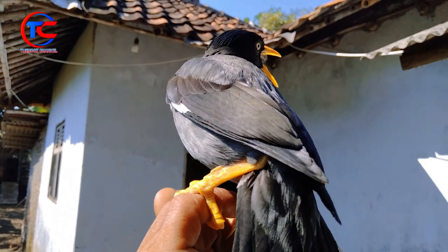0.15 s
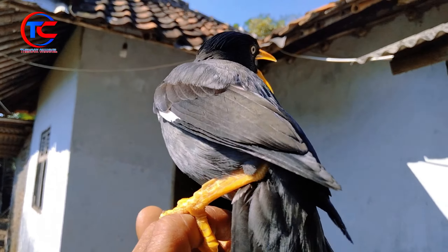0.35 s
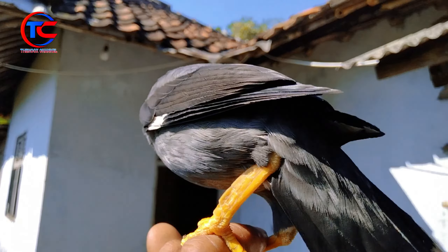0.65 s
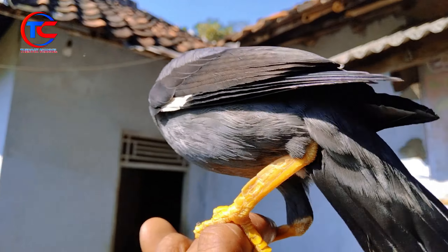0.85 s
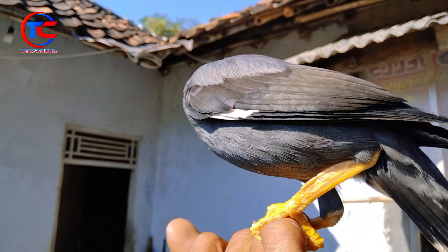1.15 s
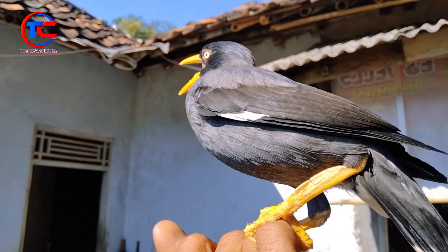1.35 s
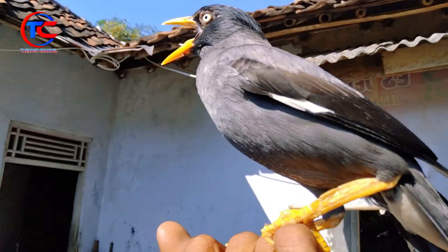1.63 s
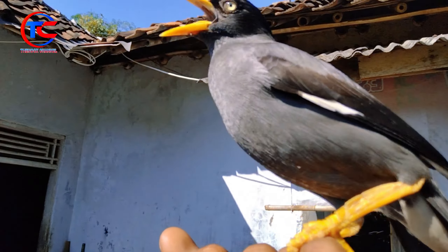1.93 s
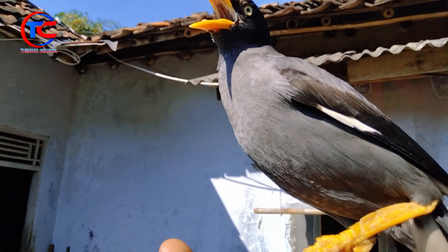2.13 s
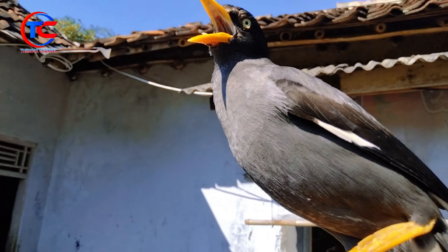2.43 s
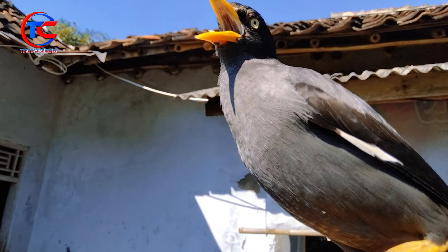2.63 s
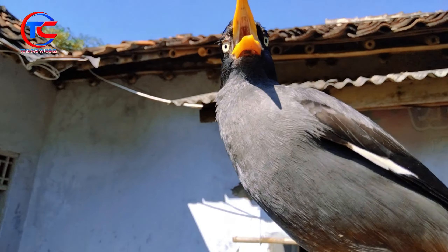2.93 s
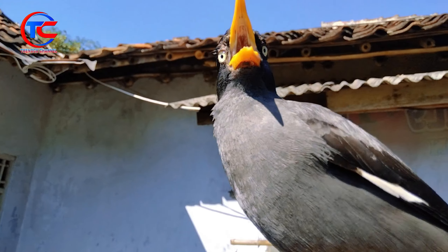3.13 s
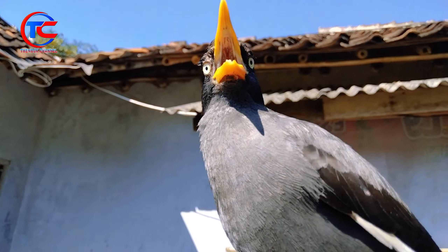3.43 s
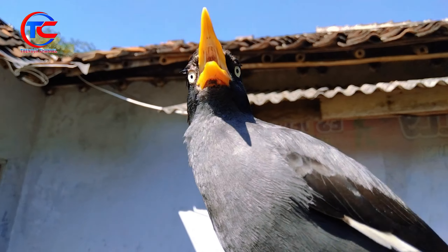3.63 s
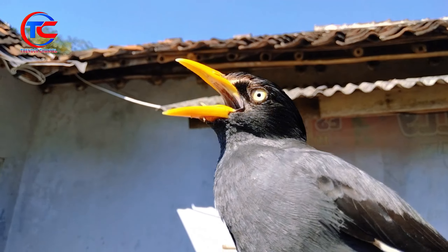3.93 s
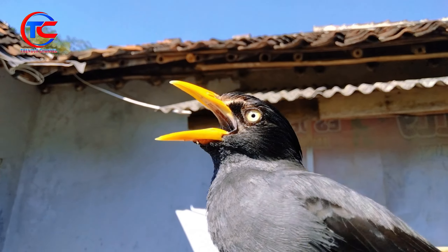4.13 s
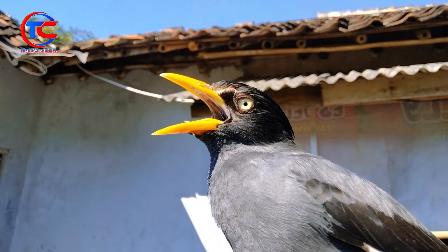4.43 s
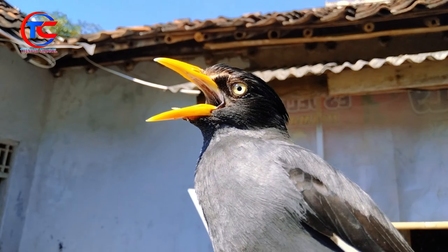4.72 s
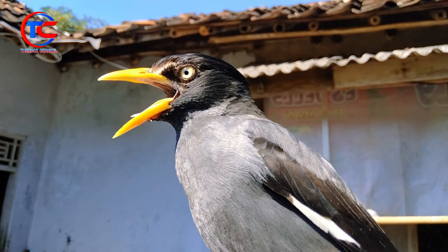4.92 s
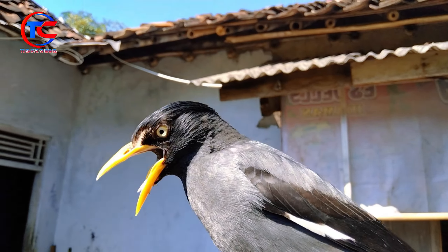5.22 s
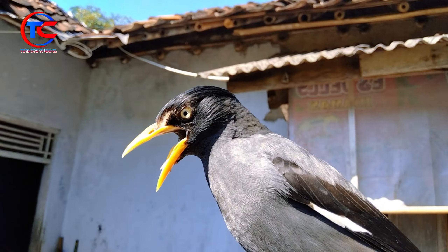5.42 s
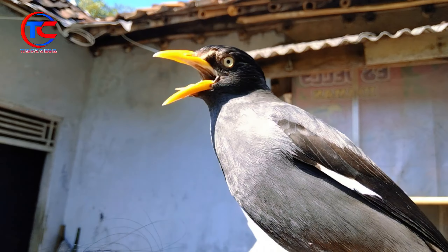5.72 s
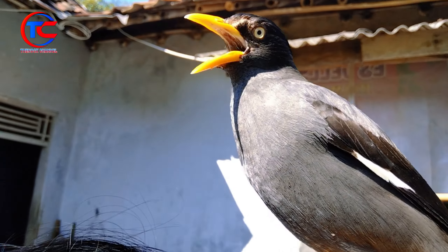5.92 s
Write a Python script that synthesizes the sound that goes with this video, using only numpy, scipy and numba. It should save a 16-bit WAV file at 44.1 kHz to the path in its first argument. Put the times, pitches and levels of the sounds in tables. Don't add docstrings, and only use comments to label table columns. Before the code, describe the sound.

Outdoors in a house yard, a loud close bird chatters hoarsely, pauses while another bird whistles gently at a distance, then fires off sharp high two-part whistles and clipped falling chips. A second burst of chatter gives way to sparse beak ticks and two isolated short notes. The sound is bright, slightly overloaded and doubled, with low traffic rumble that dips under loud calls.

```python
import sys
import numpy as np
from scipy import signal
from scipy.fft import rfft, irfft, next_fast_len
from scipy.io import wavfile
from scipy.ndimage import uniform_filter1d, minimum_filter1d
from numba import njit

SR = 44100
rng = np.random.default_rng(int(sys.argv[2]) if len(sys.argv) > 2 else 0)


def int16_out(signal):
    q = np.round(np.clip(np.atleast_2d(signal).T, -1, 1) * 32767)
    wavfile.write(sys.argv[1], SR, q.astype(np.int16))


def elevation(decibels):
    levels = np.asarray(decibels, float)
    return 10 ** (levels / 20)


N = 267598
T = np.arange(N) / SR


def colour(table, hz):
    f, db = np.transpose(table)
    return elevation(np.interp(np.log(np.maximum(hz, 1)), np.log(f), db))


def unit(x):
    return x / np.sqrt(np.mean(x ** 2))


def shaped(x, table):
    n = next_fast_len(len(x))
    hz = np.arange(n // 2 + 1) * SR / n
    return irfft(rfft(x, n) * colour(table, hz), n)[:len(x)]


def ring(x, hz, width):
    return signal.lfilter(*signal.iirpeak(hz, hz / width, SR), x)


def walk(rate):
    k = int(SR / rate)
    return unit(uniform_filter1d(uniform_filter1d(rng.standard_normal(N), k), k))


def myna(strokes, calls, wobble=.025, flutter_db=7, air_db=-16):
    throat = list(zip([900, 1300, 2350, 2950, 3600, 4400, 5400, 6200, 7200, 8500, 10800, 12500, 14500, 16000],
              [-26, -12, -13, -6, -1, 0, -8, -18, -8, -4, -9, -26, -16, -34]))
    patchy_db = 2.5
    shake = walk(740) + walk(286)
    flutter = walk(390)
    air = unit(shaped(rng.standard_normal(N), throat))
    patches = walk(150)
    columns = []
    for j in range(len(strokes[0])):
        columns.append(np.concatenate([stroke[j] + np.zeros(len(stroke[0])) for stroke in strokes]))
    ms, *shape = columns
    ms = np.maximum.accumulate(ms)
    k = np.arange(1, 25)[:, None] / 2
    out = np.zeros(N)
    for start, db, longer, slope_db, rough in calls:
        at = start + ms * np.clip(longer, .92, 1.05) / 1000
        rough = max(rough, .1)
        on = (T > at[0]) & (T < at[-1])
        pitch, effort_db, dull_db, half = (np.interp(T[on], at, column) for column in shape)
        hz = pitch * (1 + wobble * rough * shake[on])
        phase = 2 * np.pi * np.cumsum(hz) / SR
        share = np.where(k % 1 == 0, 1, np.clip(half, 0, 1))
        slope = slope_db * np.log2(np.maximum(k, 1)) + dull_db * np.log2(np.maximum(k / 2, 1))
        size = share * elevation(slope) * colour(throat, k * hz)
        breakup = np.array([np.roll(patches, 7919 * j)[on] for j in range(len(k))])
        size = size * elevation(patchy_db * breakup)
        tone = np.sum(size * np.sin(k * phase), axis=0)
        fade = np.clip((at[-1] - T[on]) / .008, 0, 1)
        level = elevation(db + effort_db + flutter_db * rough * flutter[on])
        out[on] += fade * level * (tone + elevation(air_db) * rough * air[on])
    return out


def double_whistles():
    # (time [ms], pitch [Hz], effort [dB], extra overtone slope [dB/octave], half-pitch share [0-1])
    strokes = [
        ([-4, -1, 2, 10, 18, 26, 33, 39, 43], [3000, 3450, 3900, 4820, 5480, 5460, 5300, 4800, 3800], [-39, -11.5, -2.5, 1.5, -11, -1.5, -4, -13, -38], -7, 0),
        ([45, 50, 54, 58, 66, 72, 80, 90, 105], [2700, 3150, 3620, 3920, 4230, 4580, 4780, 4900, 4880], [-19, -10.5, 2.5, 3, 3.5, -1.5, -1, -19.5, -9], -1.5, 0),
    ]
    # (time [s], level [dB], length factor, overtone slope [dB/octave], roughness [0-1])
    calls = [(1.349, -6, .95, -9, .45), (1.624, -4, 1.0, -7, .45), (1.858, -3, .95, -6, .45),
             (2.362, -4, 1.0, -3, .35)]
    return myna(strokes, calls)


def chatter_and_chips():
    # (time [ms], pitch [Hz], effort [dB], extra overtone slope [dB/octave], half-pitch share [0-1])
    chatter = [
        ([-5, -1, 4, 13, 20], [1040, 1380, 1780, 1880, 1830], [-16, -1.5, -1, 0.5, -22], -13.5, 0),
        ([21, 24, 27, 33, 39, 43], [1900, 1980, 2120, 2100, 2030, 2400], [-24, -18, -2, 3.5, -1.5, -24], -8.5, 0),
        ([44, 46, 51, 56, 62, 73, 79], [2800, 2920, 2890, 2730, 2750, 2590, 2550], [4, -10.5, -2.5, -11, -21, -5, -5.5], -5.5, 0),
        ([84, 90, 104, 112], [2470, 2350, 2270, 2250], [-10, -7, -9.5, -36], -8, 0.46),
    ]
    churk = [
        ([-7, -3, 4, 10, 14, 18], [1950, 1920, 1830, 1770, 1815, 2120], [-29, -5.5, -3.5, -1.5, -9, -2.5], -5.5, 0),
        ([21, 26, 30, 43, 48, 54], [2480, 2440, 2340, 2120, 2110, 2100], [-11, -14, -5.5, -5.5, -6, -15], -16, 0),
    ]
    hook = (([-6, -2, 2, 6, 10, 14, 22, 27, 33], [2220, 2230, 2310, 2610, 2420, 2230, 1950, 1895, 1870],
            [-35, -14, -4, -10, -4, 0, -7, -16, -40], -16, 0),)
    chip = (([-14, -10, -2, 2, 6, 10, 14, 30], [1600, 1800, 2200, 2110, 1930, 1790, 1735, 1725],
            [-32, -16, -9, -4, 0, -3, -7, -24], -17, 0),)
    slide = (([-5, -1, 2, 10, 14, 20, 26], [2010, 1990, 1950, 1710, 1640, 1610, 1600],
             [-30, -10, 0, -6, -10, -16, -35], -13, 0),)
    low_note = (([-5.5, 0, 11.5, 24.5, 39], [1430, 1498, 1472, 1394, 1300], [-32, -14, -4.5, -3.5, -3],
                -17, 0),)
    # (time [s], level [dB], length factor, overtone slope [dB/octave], roughness [0-1])
    chatter_calls = [(-.027, -4.5, 1.05, 2, 0.38), (0.114, -5.5, 1.01, 2, 0.37), (0.256, -4, 1.04, 1, 0.42),
                     (3.892, -5, 1.2, -3, 0.28), (4.041, -2.5, 1.0, -2, 0.37), (4.186, -3, 1.06, -1, 0.33),
                     (4.347, -5.5, 1.03, -1, 0.28)]
    churk_calls = [(2.612, 0.5, 1, -3.5, 0.19), (2.77, -1, .93, -2, 0.26)]
    hook_calls = [(3.34, 0, 0.93, -0.36, 0.23)]
    chip_calls = [(3.561, 0.5, 1, -1.7, 0.25), (3.763, 1, 1.2, -2, 0.39)]
    slide_calls = [(5.441, 2, 1.0, -7, 0.15)]
    low_calls = [(6.034, 3.2, 1, -8.5, 0.071)]
    voices = [(chatter, chatter_calls), (churk, churk_calls), (hook, hook_calls),
              (chip, chip_calls), (slide, slide_calls), (low_note, low_calls)]
    return sum(myna(strokes, calls) for strokes, calls in voices)


def ticks(crack_s=0.0034):
    # (time [s], level [dB])
    tick_times = [(5.28, -23.5), (5.301, -29), (5.317, -35), (5.365, -13), (5.386, -24)]
    # (frequency [Hz], width [Hz], level [dB])
    tick_modes = [(4900, 2800, -11.5), (6960, 1300, -7.5), (9400, 2200, -0.5), (14900, 1500, -5)]
    cracks = sum(elevation(db) * np.exp(-np.maximum(T - s, 0) / crack_s) * (T >= s) for s, db in tick_times)
    push = cracks * rng.standard_normal(N)
    return 3 * sum(elevation(db) * ring(ring(push, hz, width), hz, width) for hz, width, db in tick_modes)


def neighbour(edge_s=0.0059, swell_s=0.035):
    # (time [s], length [s], top pitch [Hz], top reached at share [0-1], level [dB])
    arches = [(0.412, 0.22, 2429, 0.62, -16), (.72, .175, 2573, 0.5, -25), (1.029, 0.16, 2294, 0.35, -6),
              (1.313, 0.16, 2379, 0.46, -12), (1.598, .16, 2298, 0.6, -14.5),
              (1.905, 0.16, 2220, 0.63, -10), (2.164, 0.14, 2253, 0.44, -13),
              (2.405, 0.13, 2168, 0.69, -16.5), (2.641, 0.16, 2168, 0.51, -15.5),
              (2.883, 0.15, 2368, 0.63, -14.5), (3.143, 0.12, 2335, 0.85, -16)]
    # (breath [dB], hoarseness [0-1], louder towards the end [dB],
    # dip in the middle [dB], last pitch [share of top])
    voicing = [(-37, 0.24, -5.5, 0, .87), (-34, 0.23, -5, 2.5, 0.87), (-35, 0.17, 0.5, 3, .87),
               (-35, 0.29, -3, -4, .86), (-41, 0.2, -7, -2, .89), (-40.5, .056, -4, 2.5, .88),
               (-41.5, 0.21, -4.5, 2.5, .88), (-58, 0.08, 3, -4, .92), (-45, 0.1, 0, -6.5, .93),
               (-41, 0.32, 1, 8, 0.85), (-40.5, 0.24, -5, -3, 1)]
    # (time [s], length [s], from [Hz], to [Hz], level [dB])
    breaks = [
        (.795, .09, 2790, 2810, -25),
        (.872, .038, 2400, 2060, -13),
    ]
    # (frequency [Hz], level [dB per Hz])
    breath_colour = [(1500, -16), (3000, -18), (5300, -24), (6300, -1), (8000, -4), (9600, 0), (11300, -20),
                     (14500, -26)]
    start_hz, rise_power, fall_power = 1806, 2.1, 2.68
    arch_edge_db, breath_edge_db, edge_power = -15.5, -14, 5.8
    out, puff = np.zeros(N), np.zeros(N)
    wobble, flutter = walk(230), walk(110)
    rasp = unit(ring(ring(rng.standard_normal(N), 2200, 900), 2200, 900))
    for arch, voice in zip(arches, voicing):
        s, length, top_hz, peak, db = arch
        air_db, hoarse, tilt_db, dip_db, last = voice
        on = (T > s) & (T < s + length)
        u = (T[on] - s) / length
        rise = np.clip(1 - u / peak, 0, 1)
        fall = np.clip((u - peak) / (1 - peak), 0, 1)
        hz = top_hz - (top_hz - start_hz) * rise ** rise_power - top_hz * (1 - last) * fall ** fall_power
        phase = 2 * np.pi * np.cumsum(hz * (1 + 0.032 * hoarse * wobble[on])) / SR
        fade = np.clip(np.minimum(u, 1 - u) * length / edge_s, 0, 1)
        edge = abs(2 * u - 1) ** edge_power
        level_db = db + arch_edge_db * edge + tilt_db * (2 * u - 1) - dip_db * np.sin(np.pi * u) ** 2
        breath = elevation(air_db + breath_edge_db * edge)
        out[on] += fade * elevation(level_db + 10 * hoarse * flutter[on]) * np.sin(phase)
        out[on] += fade * hoarse * elevation(13.5) * breath * rasp[on]
        puff[on] += breath
    for s, length, from_hz, to_hz, db in breaks:
        u = np.clip((T - s) / length, 0, 1)
        hz = (from_hz + (to_hz - from_hz) * u) * (1 + 0.0069 * wobble)
        out += elevation(db + 2.2 * flutter) * np.sin(np.pi * u) * np.sin(2 * np.pi * np.cumsum(hz) / SR)
    k = int(swell_s * SR)
    puff = uniform_filter1d(uniform_filter1d(puff, k), k) * elevation(0.55 * walk(30))
    return out + puff * unit(shaped(rng.standard_normal(N), breath_colour))


def walls(x, gap_s=0.0045):
    # (frequency [Hz], level [dB])
    wall_colour = [(1500, 8), (3800, -5), (4900, 4), (6000, -11), (9000, 5.5), (14000, 11)]
    t60_s, wall_db = 0.18, -23
    t = T[:SR // 2]
    noise = rng.standard_normal(len(t)) ** 3
    tail = signal.lfilter(*signal.butter(1, 9000, fs=SR), noise) * elevation(-60 * t / t60_s) * (t > gap_s)
    tail = tail / np.linalg.norm(tail)
    return elevation(wall_db) * signal.fftconvolve(shaped(x, wall_colour), tail)[:N]


def yard():
    # (frequency [Hz], level [dB per Hz])
    yard_colour = [(20, -1.5), (32, -13.5), (40, -10), (50, -8), (70, 0.5), (110, -12), (300, -12.5),
                   (900, -17), (1900, -16), (3800, -27.5), (7000, -34.5), (9200, -24.5), (12000, -42),
                   (15500, -41.5)]
    # (frequency [Hz], width [Hz], level [dB])
    motor_hums = [(27.6, 3.5, -45), (85, 9.5, -41.5), (122, 12.7, -43), (594, 5.9, -51)]
    # (time [s], level [dB])
    traffic = [(0, -31), (.5, -35.5), (1.0, -34), (1.4, -36), (2.3, -36.5), (3.3, -36.5), (4.6, -36.5),
               (6.07, -34.5)]
    noise = unit(shaped(rng.standard_normal(N), yard_colour))
    low = signal.lfilter(*signal.butter(1, 400, fs=SR), noise)
    bed = noise - low + low * elevation(0.48 * walk(4.8))
    hums = sum(elevation(db) * unit(ring(rng.standard_normal(N), hz, width)) for hz, width, db in motor_hums)
    passing = elevation(np.interp(T, *np.transpose(traffic)))
    return passing * (elevation(2.5) * bed + elevation(38.5) * hums)


def whines(width_hz=25):
    # (from [s], to [s], frequency [Hz], level [dB])
    far_whines = [(.44, .63, 1700, -46), (.82, 1.24, 1100, -46), (.84, 1.02, 400, -42),
                  (.72, .92, 1900, -44)]
    out = np.zeros(N)
    for start, end, hz, db in far_whines:
        u = np.clip((T - start) / (end - start), 0, 1)
        swell = np.sqrt(np.sin(np.pi * u).clip(0))
        out += elevation(db) * swell * unit(ring(rng.standard_normal(N), hz, width_hz))
    return out


@njit
def follow(x, attack, release):
    y, e = np.empty(len(x)), 0.
    for i in range(len(x)):
        e += (x[i] - e) * (attack if x[i] > e else release)
        y[i] = e
    return y


def ducking(near):
    # (frequency [Hz], level [dB])
    duck_tilt = [(2000, -5), (3500, -6), (5200, -9.5), (9000, 11)]
    from_db, slope, attack_s, release_s = -16, 1.096, 0.024, 0.074
    size = uniform_filter1d(abs(shaped(near, duck_tilt)), int(0.0033 * SR))
    heard = follow(size, 1 / (attack_s * SR), 1 / (release_s * SR))
    return (1 + heard / elevation(from_db)) ** -slope


def scene():
    whistles = double_whistles()
    near = whistles + chatter_and_chips()
    duck = ducking(near)
    birds = near + duck * neighbour() + ticks()
    echoes = walls(birds + elevation(-6) * whistles)
    background = duck * (yard() + whines())
    return (birds + echoes + background)[None]


def band_limit(x):
    return signal.sosfilt(signal.butter(12, 16450, fs=SR, output="sos"), x)


def record(dry, copy=.95, look_s=.003, top=1.03):
    lag = 441
    x = dry[0] + copy * np.concatenate([np.zeros(lag), dry[0, :-lag]])
    x = signal.sosfilt(signal.ellip(8, .2, 60, 15700, fs=SR, output="sos"), x)
    k = int(look_s * SR)
    gain = uniform_filter1d(minimum_filter1d(top / np.maximum(abs(x), top), k), k)
    return band_limit(np.clip(x * gain, -1, 1)[None])


dry = scene()
out = record(dry)
int16_out(out)
```